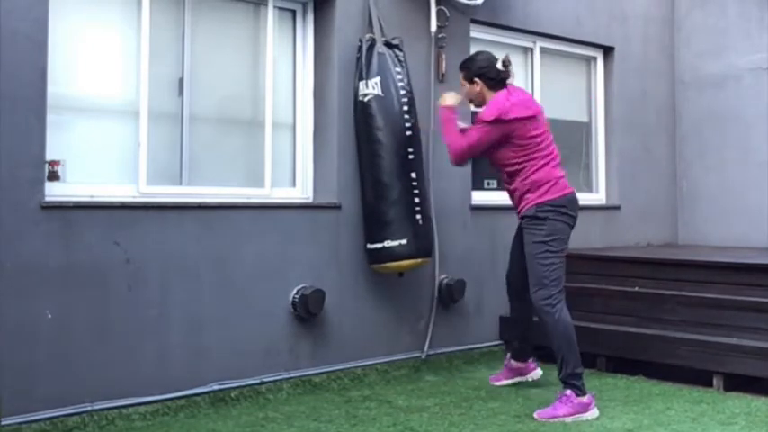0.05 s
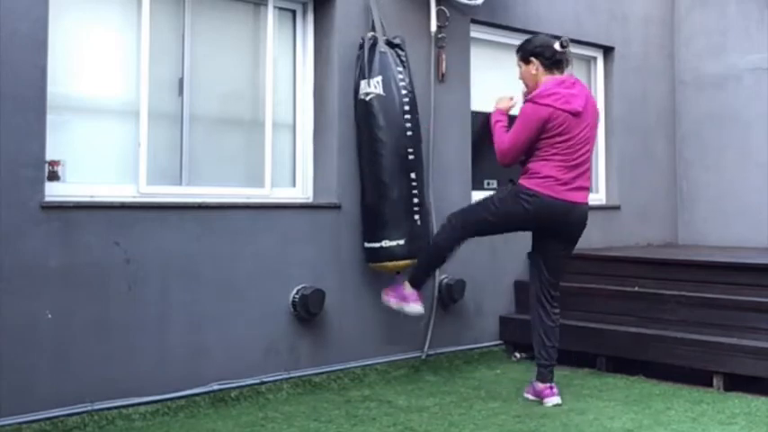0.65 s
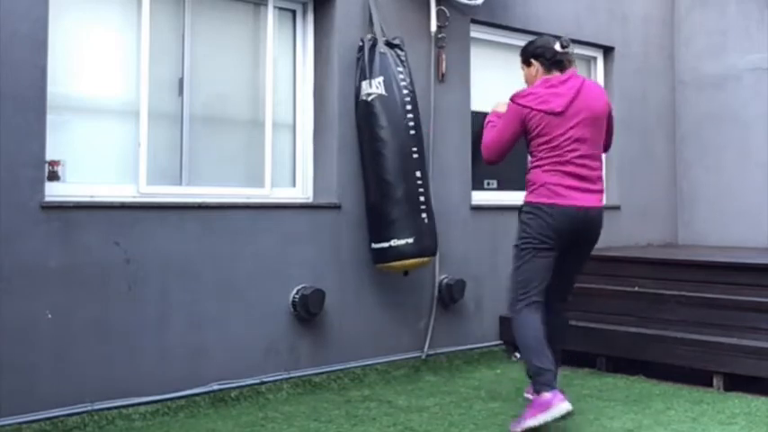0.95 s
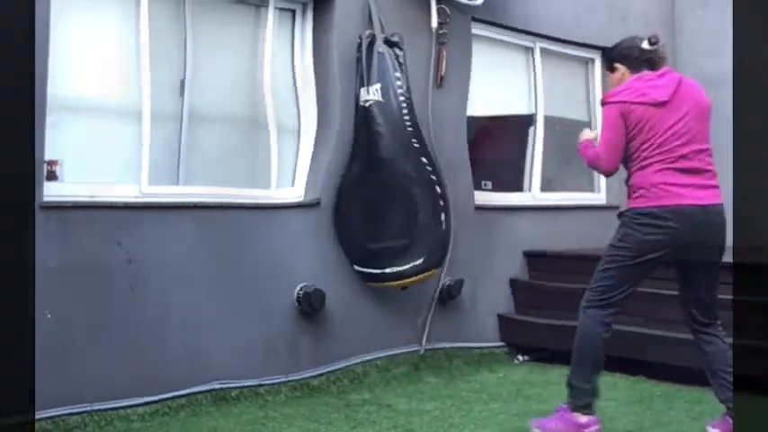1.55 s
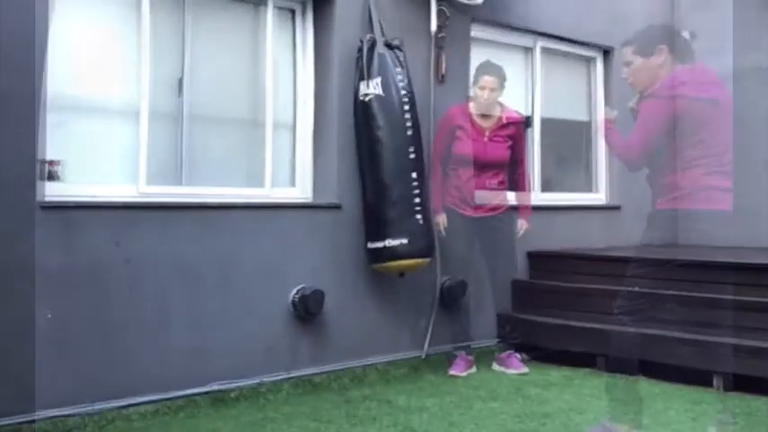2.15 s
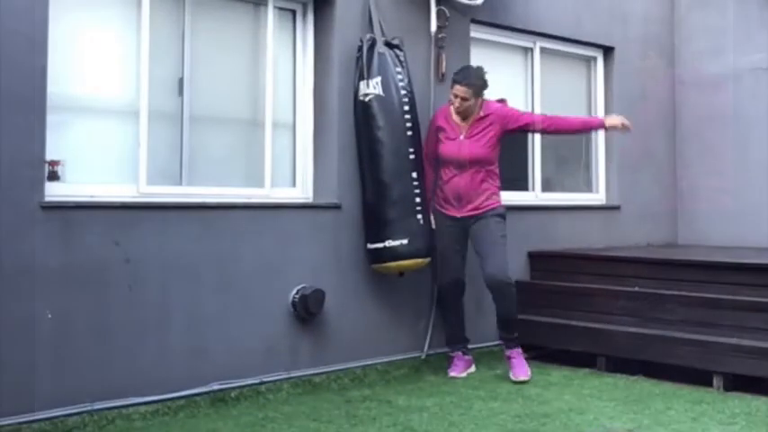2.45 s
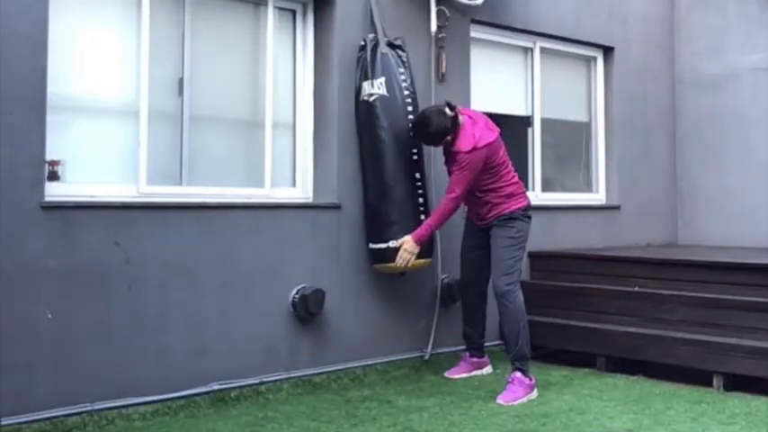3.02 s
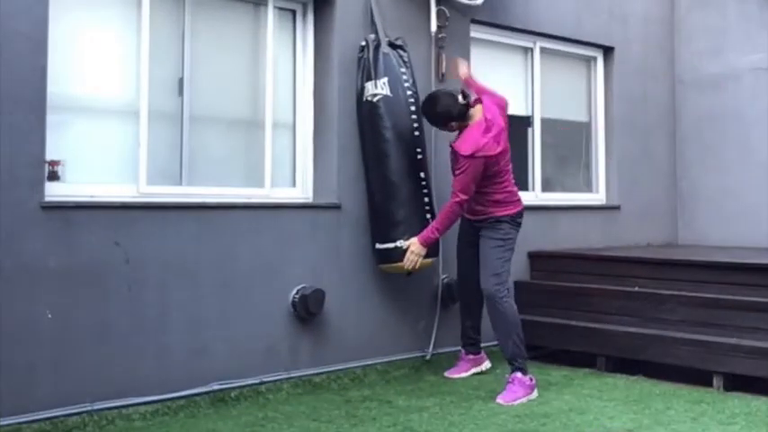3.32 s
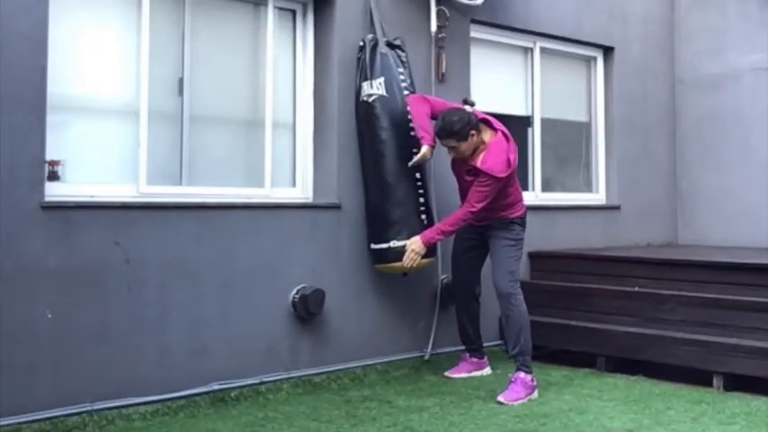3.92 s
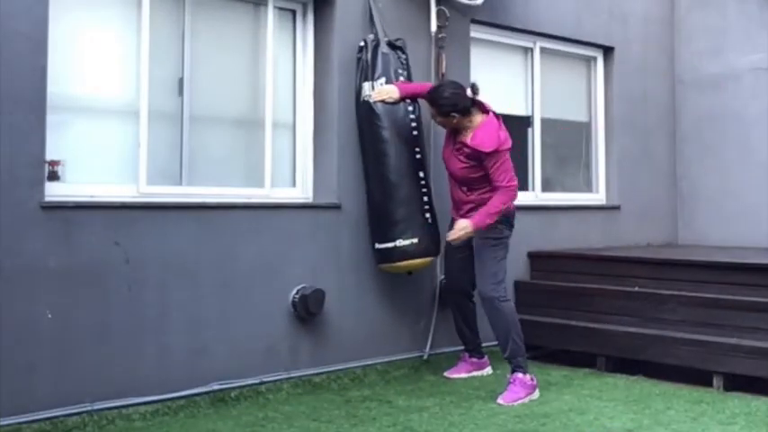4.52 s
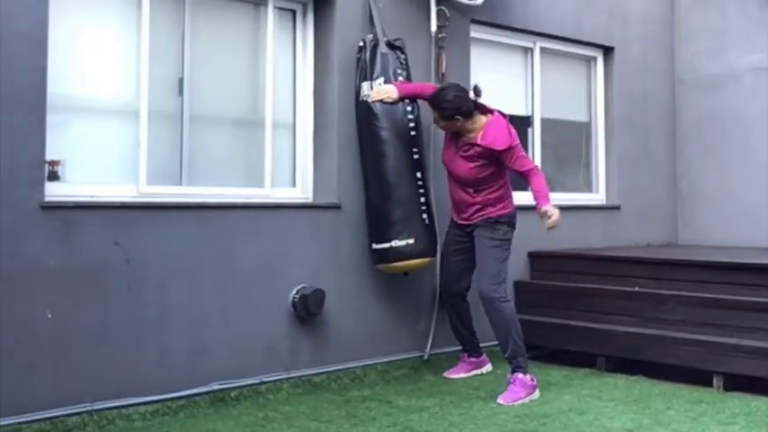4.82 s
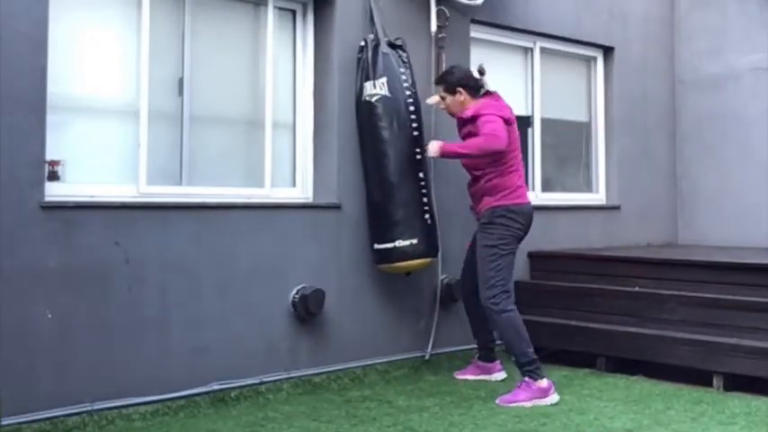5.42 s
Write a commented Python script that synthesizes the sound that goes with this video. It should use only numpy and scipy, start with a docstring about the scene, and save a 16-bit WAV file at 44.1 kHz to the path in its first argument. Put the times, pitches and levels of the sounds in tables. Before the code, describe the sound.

A blow on a hanging heavy bag is already dying away as a low boom in a small walled yard. At 0.2 seconds a bare fist lands with a light slap and dull knock. A kick thuds at about 0.65 seconds, and the steel chain jingles briefly until 0.9. From 1 to 1.8 seconds shoes scuff and crunch on artificial turf while clothes swish softly. Another scuff at 2.7 leads into a loud, sharp smack on the vinyl cover at 2.9, with a low boom ringing between the walls. A forearm slides faintly over the bag around 4.1 seconds, then a second loud smack lands at 4.4. A softer punch thuds at 5.2, followed by a small step and cloth rustle. Every hit has a short echo, and a faint low rumble of distant traffic runs underneath.

```python
"""Small walled yard: bare fists and a kick land on a hanging heavy bag.
Each blow slaps the vinyl cover, knocks the filling and sets the air between the walls booming.
The kick jingles the hanging chain. Shoes scuff artificial turf, clothes swish and a forearm
slides on the bag, over a distant town rumble."""
import sys
import numpy as np
from scipy import signal
from scipy.fft import rfft, irfft, next_fast_len
from scipy.io import wavfile
from scipy.ndimage import uniform_filter1d

SR = 44100
rng = np.random.default_rng(int(sys.argv[2]) if len(sys.argv) > 2 else 0)


def bounce(signal):
    """Save signal as a 16-bit WAV file at the path given by the first command-line argument."""
    frames = np.transpose(np.atleast_2d(signal))
    limited = np.clip(frames, -1, 1)
    pcm = np.round(limited * 32767).astype(np.int16)
    wavfile.write(sys.argv[1], SR, pcm)


N = 250026
TIME_S = np.arange(N) / SR
AGE_S = np.arange(SR) / SR  # time since a contact


def amp(db):
    """Decibels to gain."""
    return 10 ** (np.asarray(db) / 20)


def unit(x):
    """Scale to rms 1."""
    return x / np.sqrt(np.mean(x ** 2) + 1e-20)


def along(points, hz):
    """Interpolate (f/Hz, value) points on a log axis."""
    f, v = np.transpose(points)
    return np.interp(np.log(hz + 1), np.log(f), v)


def hump(hz, centre_hz, octaves):
    """Bell of height 1 on the octave axis."""
    return np.exp(-.5 * (np.log2((hz + 1) / centre_hz) / octaves) ** 2)


def filtered(x, response):
    """Apply the gain response(hz)."""
    size = next_fast_len(len(x) + 8192)
    return irfft(rfft(x, size) * response(np.fft.rfftfreq(size, 1 / SR)), size)[:len(x)]


def noise(colour, size):
    """Noise of rms 1, spectrum colour(hz) in dB."""
    return unit(filtered(rng.standard_normal(size), lambda hz: amp(colour(hz))))


def gritty(x, depth_db):
    """Break a rush into millisecond grains."""
    grains = unit(uniform_filter1d(rng.standard_normal(len(x)), size=60))
    return unit(x * amp(depth_db * grains))


def stroke(peak_s, rise_s, fall_s):
    """Pulse of height 1 with exponential flanks."""
    offset_s = TIME_S - peak_s
    flank_s = np.where(offset_s < 0, rise_s, fall_s)
    return 1 / np.cosh(np.minimum(np.abs(offset_s) / flank_s, 20))


def add(track, at_s, sound):
    """Mix a sound into the track."""
    start = round(at_s * SR)
    part = sound[max(-start, 0):][:N - max(start, 0)]
    track[max(start, 0):][:len(part)] += part


def walls(x):
    """Direct sound plus first wall echoes."""
    # echoes: delay/s, level/dB
    echoes = [(0.018, -12), (0.023, -10.5), (0.029, -19.5), (.047, -15)]
    return x + sum(amp(db) * np.pad(x, (round(delay_s * SR), 0))[:len(x)] for delay_s, db in echoes)


def tail(colour, build_s=0.0049):
    """Diffuse sound between the walls, energy 1; treble dies first."""
    # reverberation time: f/Hz, t60/s
    decay = [(100, 0.62), (400, 0.52), (1500, 0.6), (3500, 0.57), (6000, 0.48), (11000, 0.36),
             (16000, 0.22)]
    # reverberation spectrum: f/Hz, level/dB
    yard_colour = [(40, 3), (70, 20), (160, -20), (280, 0.5), (600, 3), (1500, 0.5), (5000, 0), (15000, 6)]
    wash = noise(lambda f: colour(f) + along(yard_colour, f), SR)
    hz, t_s, bands = signal.stft(wash, SR, nperseg=256)
    bands = bands * amp(-60 * t_s / along(decay, hz)[:, None])
    fading = signal.istft(bands, SR, nperseg=256)[1][:SR]
    fading *= 1 - np.exp(-(AGE_S / build_s) ** 2)
    return fading / np.linalg.norm(fading)


def yard(x, wet_db):
    """A sound with the yard's echoes and reverberation."""
    return walls(x) + amp(wet_db) * signal.fftconvolve(x, tail(np.zeros_like))[:len(x)]


def slap(contact_s, rings, wet_db, skew=1.12, crease_db=-18, crease_t60_s=0.099):
    """Vinyl flattens, rings broadly at pitches set by the spot struck, then creases."""
    # slap spectrum: f/Hz, density/dB
    spectrum = [(100, 10), (450, -7.5), (700, 3.5), (1000, -0.5), (1450, 1), (2450, -6.5), (3500, -3),
                (6500, -9), (10000, -14.5), (15500, -20.5)]
    colour = lambda hz: along(spectrum, hz) + sum(db * hump(hz, f, octaves=.12) for f, db in rings)
    press = np.abs(np.sin(np.pi * np.clip(AGE_S / contact_s, 0, 1) ** skew))
    crease = amp(crease_db - 60 * AGE_S / crease_t60_s)
    crack = gritty(noise(colour, SR), depth_db=0.2) * (0.82 * press + crease)
    return walls(crack) + amp(wet_db) * np.sqrt(contact_s * SR) * tail(colour)


def knock(contact_s, start_hz, end_ratio=0.297, sink_s=0.0094, t60_s=0.049):
    """The filling gives way; pitch drops as the dent grows."""
    pitch_hz = start_hz * (end_ratio + (1 - end_ratio) * np.exp(-AGE_S / sink_s))
    rise = 1 - np.exp(-3 * AGE_S / contact_s)
    return 2.2 * np.sin(2 * np.pi * np.cumsum(pitch_hz) / SR) * rise * amp(-60 * AGE_S / t60_s)


def boom(tilt_db_oct, lag_s=0.0037, swell_s=0.0013, diffuse_db=-12, diffuse_t60_s=0.72):
    """The bag's flank shoves the air and rings the yard; soft blows favour the lowest modes."""
    # standing waves between the walls: f/Hz, level/dB, t60/s
    modes = [(58.8, -6, 0.8), (63.9, -14.5, 1), (73.8, 0.5, 1.108), (82.9, -34, 0.39), (82.7, -20, .55),
             (97.7, -3.5, 0.8), (111.7, 1.5, 0.54), (122.8, 4, 0.27), (133.3, -12, 1.19), (136.9, -1, 0.57),
             (166.7, -3, 0.75), (188.4, -2.5, 0.48), (217, -12.5, 0.2), (223, -13, 0.57),
             (259.7, -25, 0.45), (306, -33, 1), (360, -28, 0.68)]
    t_s = np.maximum(AGE_S - lag_s, 0)
    waves = np.zeros(SR)
    for k, (hz, db, t60_s) in enumerate(modes):
        level_db = db + tilt_db_oct * np.log2(hz / 75) + .5 * rng.standard_normal()
        waves += (-1) ** k * amp(level_db - 60 * t_s / t60_s) * np.sin(2 * np.pi * hz * t_s)
    # modes too close to tell apart: f/Hz, density/dB
    dense = [(50, -15), (100, -26), (180, -11.5), (270, -12.5), (600, -28.5), (2000, -59)]
    diffuse = noise(lambda hz: along(dense, hz), SR) * amp(diffuse_db - 60 * t_s / diffuse_t60_s)
    return (waves + diffuse) * (1 - np.exp(-t_s / swell_s))


def bag(dent_fraction=0.29):
    """Each blow slaps the cover; partway through contact the filling knocks and the yard booms."""
    # blows: t/s, slap/dB, contact/s, low cover ring f/Hz, gain/dB, high cover ring f/Hz, gain/dB,
    # knock/dB, knock f/Hz, boom/dB, boom tilt/(dB/octave), slap reverberation/dB
    # The first lands before t = 0 and only rings out; the kick lands twice, foot then shin.
    blows = [(-.2, -34.5, 0.01, 1180, -2, 2430, 7, -21.5, 570, -37, 3.5, 5.5),
             (0.1896, -41.5, 0.0094, 2210, 6.5, 6700, 4.5, -35, 642, -47, 7, 5),
             (.641, -43.5, 0.0202, 1050, 8.5, 2400, 9, -28, 608, -29, -9.5, 7.5),
             (.691, -44, 0.0063, 1100, -8, 2500, -8, -36, 568, -56, -12, 5.5),
             (2.9193, -25.5, 0.0077, 1900, 9.5, 5000, 3, -40.5, 775, -29, -0.5, -1.5),
             (4.4031, -27, 0.0075, 1104, 7.5, 3180, 4.5, -31.5, 706, -29, 1.5, -1),
             (5.1791, -41, 0.0065, 1480, 3, 4400, 5, -34.5, 635, -32.5, -7.5, 6.5)]
    out = np.zeros(N)
    for (at_s, slap_db, contact_s, low_hz, low_db, high_hz, high_db,
         knock_db, knock_hz, boom_db, tilt_db_oct, wet_db) in blows:
        rings = [(low_hz, low_db), (high_hz, high_db)]
        add(out, at_s, amp(slap_db) * slap(contact_s, rings, wet_db))
        filling = amp(knock_db) * yard(knock(contact_s, knock_hz), wet_db=-2)
        air = amp(boom_db) * boom(tilt_db_oct)
        add(out, at_s + dent_fraction * contact_s, filling + air)
    return out


def town(level_db=-61.5, dip_db=-4.5):
    """Far traffic: steady low rumble; the background level dips briefly near 2 s."""
    # rumble spectrum: f/Hz, density/dB
    spectrum = [(25, -13.5), (38, -15), (50, 0.5), (68, -0.5), (110, -4.5), (210, -14), (300, -15.5),
                (540, -19), (850, -24.5), (1450, -29), (2000, -34), (6000, -40), (12000, -44), (16000, -51)]
    dip = stroke(peak_s=2.03, rise_s=0.13, fall_s=0.13)
    return amp(level_db + dip_db * dip) * noise(lambda hz: along(spectrum, hz), N)


def clothes():
    """Cloth swishes with limb speed; overlapping swings add in power."""
    # limb swings: fastest at t/s, level/dB, rise/s, fall/s
    swings = [(0, -64.5, .05, 0.048), (.38, -65, 0.095, 0.038), (1.005, -60, 0.037, 0.06),
              (1.12, -61.5, .025, 0.066), (1.389, -66, 0.085, 0.054), (1.57, -62.5, 0.037, 0.024),
              (1.689, -66, 0.045, 0.048), (1.86, -75, 0.09, 0.12), (2.37, -76.5, 0.074, .06),
              (2.78, -66.5, 0.035, 0.13), (3.48, -77, 0.089, 0.17), (3.77, -74.5, .02, 0.024),
              (4.39, -74.5, 0.082, 0.036), (5.17, -64.5, 0.1, 0.049), (5.47, -71, 0.061, 0.054),
              (5.665, -69.5, 0.029, .04)]
    # swish spectrum: f/Hz, density/dB
    spectrum = [(410, -28), (700, -2), (1330, -2.5), (1770, -1), (2100, -2), (3790, -3), (4430, -5.5),
                (10900, -11), (16000, -19.5)]
    power = sum((amp(db) * stroke(at_s, rise_s, fall_s)) ** 2 for at_s, db, rise_s, fall_s in swings)
    swish = gritty(noise(lambda hz: along(spectrum, hz), N), depth_db=1.26)
    return yard(np.sqrt(power) * swish, wet_db=-11.5)


def chain(chatter_rad=0.054, tick_db=-3, tick_t60_s=0.057, rise_s=.003, trim_db=-4):
    """Steel links grind and snap taut; loose touches ring only the highest modes."""
    # link contacts: t/s, level/dB, deep ring/dB
    clinks = [(.707, -47.5, 15.5), (.724, -40, 6), (.745, -50, 0), (.77, -62, -1), (0.867, -46.5, -20),
              (.885, -47, -29)]
    # link modes: f/Hz, level/dB, t60/s
    modes = [(3710, -24, 0.11), (3780, 3, 0.02), (6960, -15, .035), (11320, -6.5, 0.09),
             (11510, 0.5, 0.099), (12700, -2, 0.1), (13680, -14, 0.1)]
    # grind spectrum: f/Hz, density/dB
    spectrum = [(400, -1), (1700, 5), (4000, -2), (9000, -12), (15000, -6)]
    out = np.zeros(N)
    for at_s, db, deep_db in clinks:
        grind = noise(lambda hz: along(spectrum, hz), SR)
        clink = amp(tick_db + deep_db - 60 * AGE_S / tick_t60_s) * grind
        for hz, mode_db, t60_s in modes:
            ring_db = mode_db + deep_db * (hz < 9000) + 6.0 * rng.standard_normal()
            blur_rad = chatter_rad * np.cumsum(rng.standard_normal(SR))  # chatter blurs the pitch
            clink += amp(ring_db - 60 * AGE_S / t60_s) * np.sin(2 * np.pi * hz * AGE_S + blur_rad)
        add(out, at_s, amp(db + trim_db) * clink * (1 - np.exp(-AGE_S / rise_s)))
    return yard(out, wet_db=-6)


def footwork(octaves=1.03, depth_db=27):
    """Soles crunch the plastic grass."""
    # scuffs: t/s, level/dB, centre f/Hz, rise/s, t60/s
    steps = [(1.03, -52, 6400, 0.00093, 0.022), (1.0838, -43.5, 3070, 0.0008, 0.016),
             (1.519, -54.5, 2573, 0.0064, .19), (1.789, -48, 4800, 0.0011, 0.031),
             (1.824, -50.5, 4070, 0.00079, 0.047), (2.533, -66, 7300, .002, 0.062),
             (2.733, -41, 3400, 0.0074, 0.056), (3.213, -56.5, 1970, 0.0046, 0.054),
             (5.397, -59.5, 7930, 0.00085, 0.023)]
    out = np.zeros(N)
    for at_s, db, centre_hz, rise_s, t60_s in steps:
        rush = noise(lambda hz: depth_db * (hump(hz, centre_hz, octaves) - 1), SR)
        envelope = amp(db - 60 * AGE_S / t60_s) * (1 - np.exp(-AGE_S / rise_s))
        add(out, at_s, gritty(rush, depth_db=4.5) * envelope)
    return yard(out, wet_db=-6)


def rub(level_db=-65.5, centre_hz=313, octaves=1.34, depth_db=42):
    """A forearm slides over the padded cover: soft, low rush."""
    rush = noise(lambda hz: depth_db * (hump(hz, centre_hz, octaves) - 1), N)
    return amp(level_db) * stroke(peak_s=4.06, rise_s=0.044, fall_s=0.027) * rush


def scene():
    """Mono sum at the microphone."""
    return (bag() + chain() + rub() + clothes() + footwork() + town())[None]


def record(dry, low_cut_hz=46, top_hz=15850):
    """Microphone: steep bass cut, hard upper band limit."""
    low_cut = signal.butter(8, low_cut_hz, "high", fs=SR, output="sos")
    return filtered(signal.sosfilt(low_cut, dry[0]), lambda hz: hz < top_hz)[None]


dry = scene()
out = record(dry)
bounce(out)
```